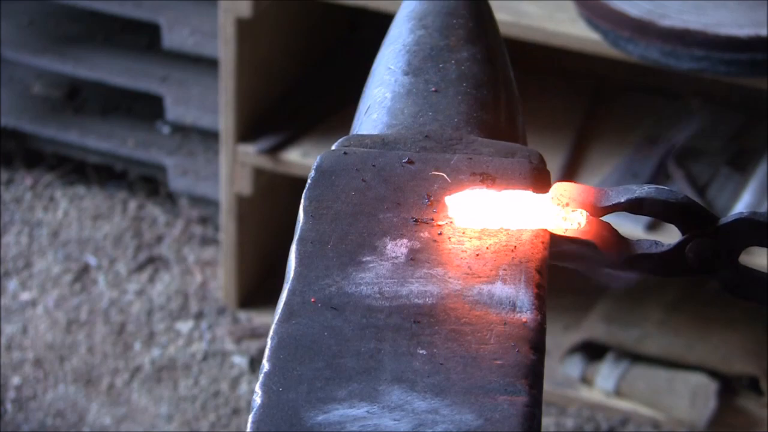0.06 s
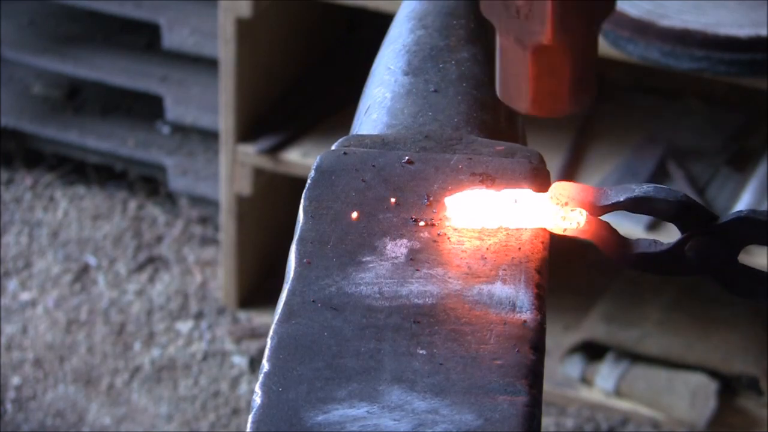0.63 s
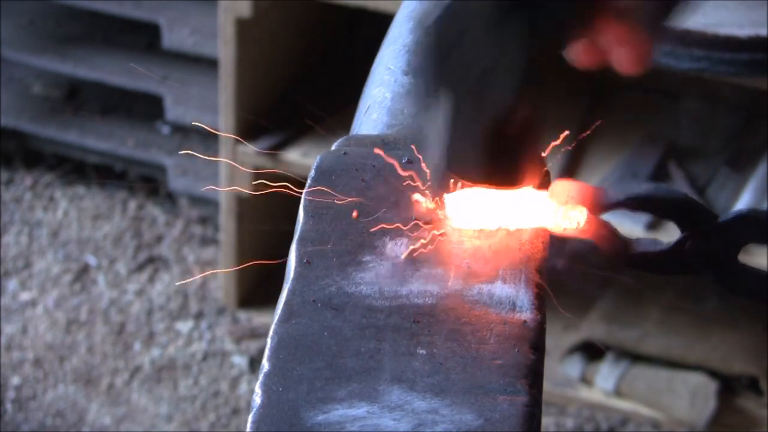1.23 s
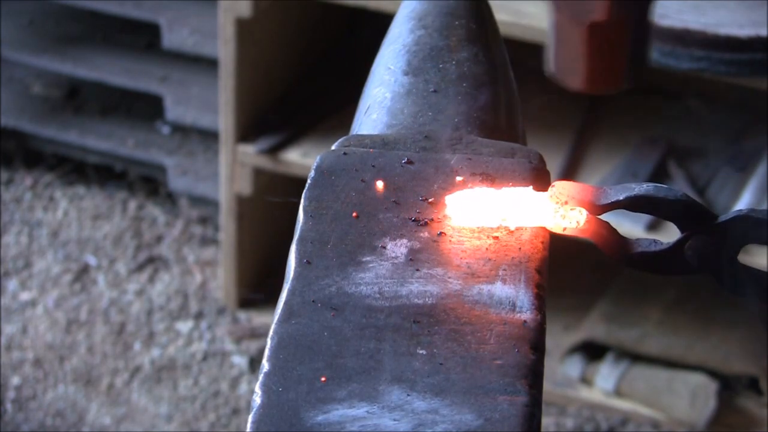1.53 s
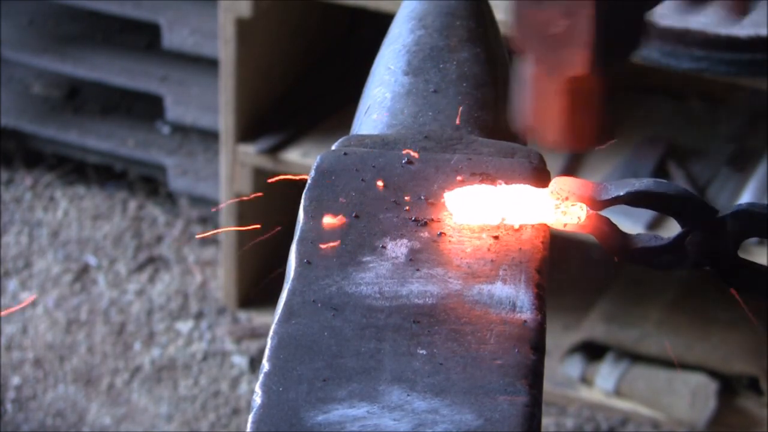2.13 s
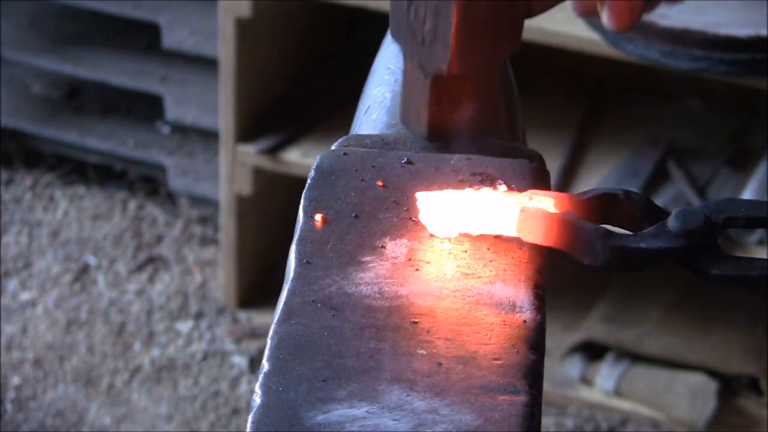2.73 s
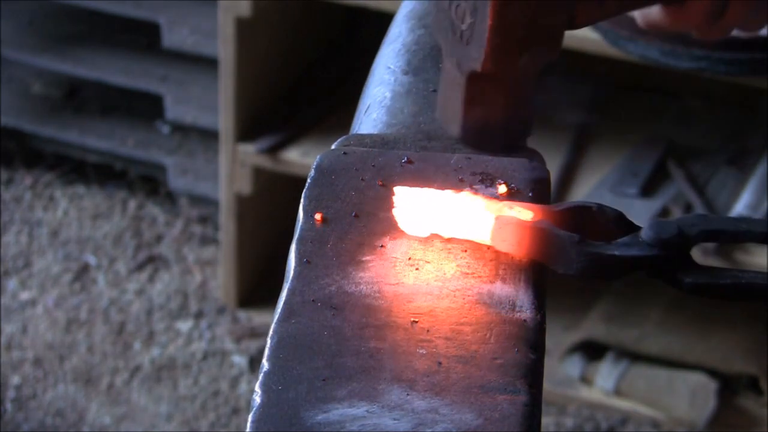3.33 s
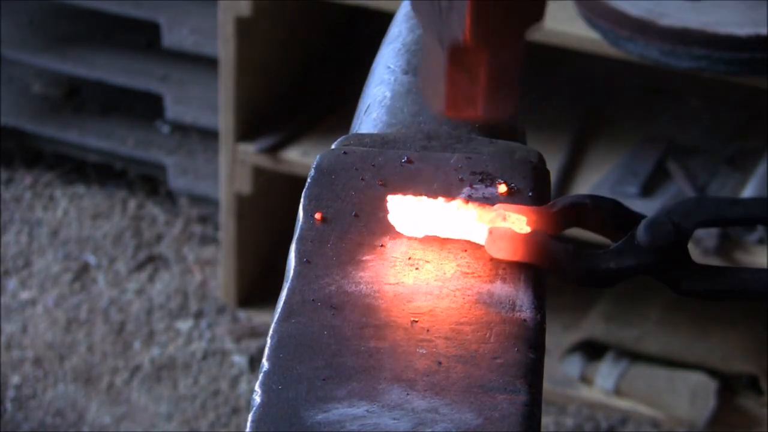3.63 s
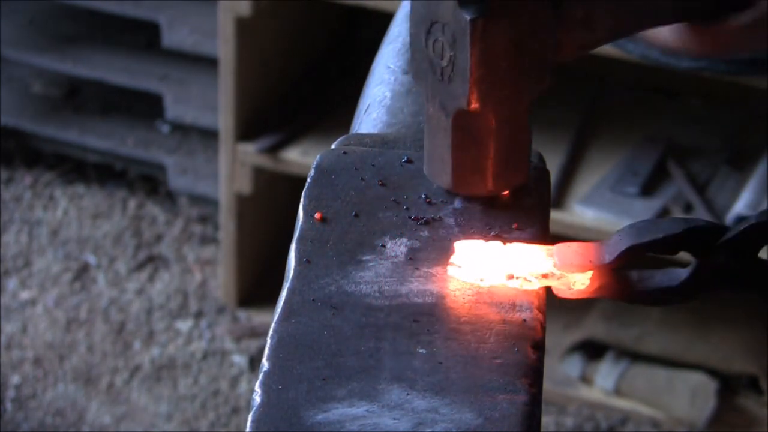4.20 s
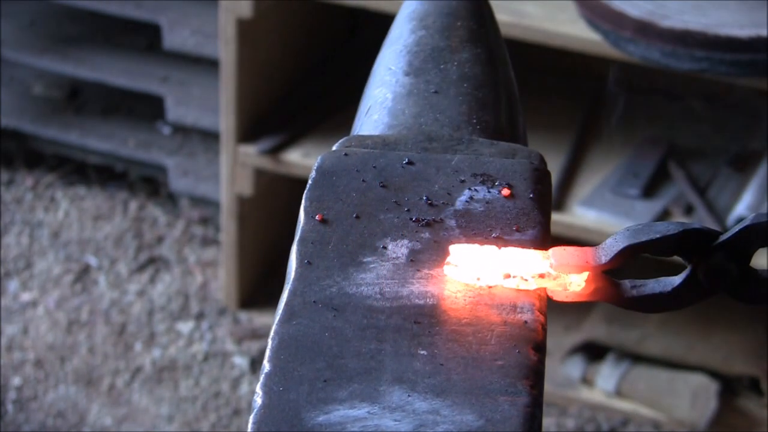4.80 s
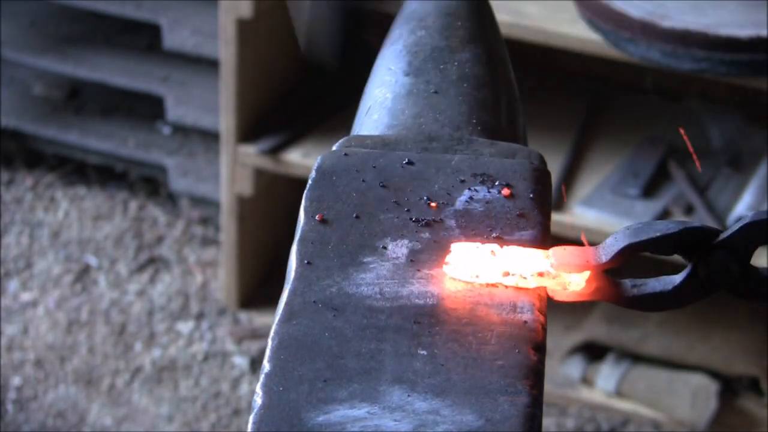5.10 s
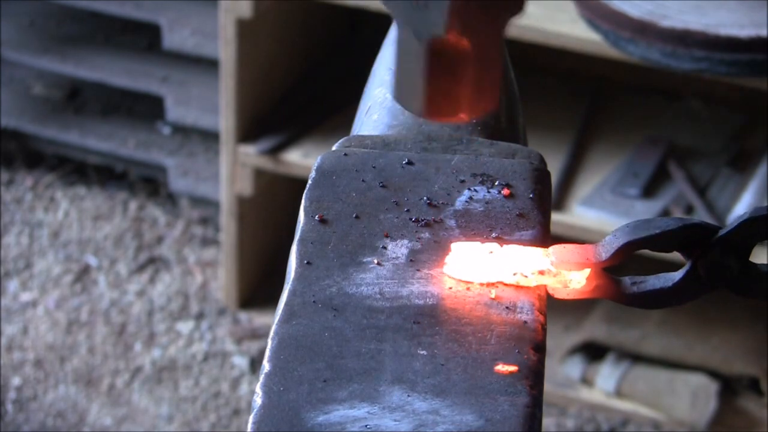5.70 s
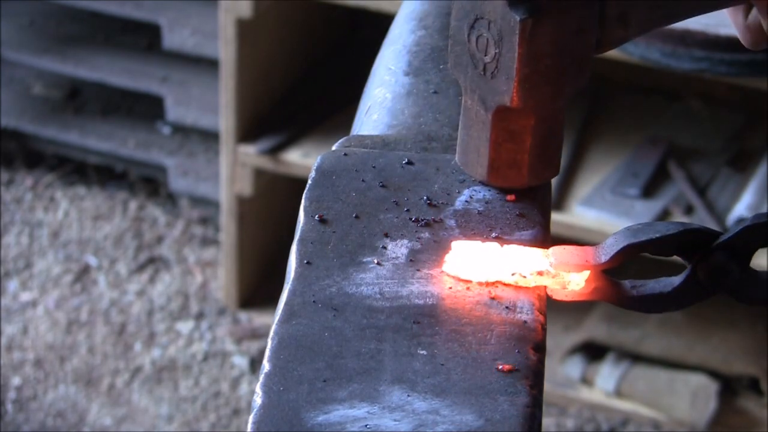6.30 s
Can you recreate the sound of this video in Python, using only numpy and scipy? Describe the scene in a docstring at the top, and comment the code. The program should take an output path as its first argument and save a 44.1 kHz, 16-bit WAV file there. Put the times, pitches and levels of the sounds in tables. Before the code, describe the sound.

A hand hammer strikes hot iron on a steel anvil three times, each blow a sharp crack with a short, bright ring, the first two followed by a light tap. The hammer then drops on the bare anvil and bounces. In a pause, tongs faintly scrape and clink. Two duller blows and a soft, thudding tap follow. The sound is close, in a small workshop with a faint hiss.

```python
"""Ringing hammer blows on a steel anvil: a smith forges hot iron in a small workshop.
Each blow knocks, cracks the scale, thumps the stand and rings anvil, hammer and tongs.
The loosely held hammer also taps the bare anvil and may bounce. Between blows the tongs turn
the iron and scale ticks off over a faint hiss. A limiter ducks the blows; the ring swells back."""
import sys
import numpy as np
from scipy import signal
from scipy.fft import rfft, irfft
from scipy.io import wavfile
from scipy.ndimage import uniform_filter1d

SR = 44100
rng = np.random.default_rng(int(sys.argv[2]) if len(sys.argv) > 2 else 0)


def unload_audio(sound):
    """Save the sound as a 16-bit wav file, at the path given as the first command line argument."""
    columns = np.transpose(np.atleast_2d(sound))
    # keep every value between -1 and 1, then stretch to whole-number steps
    steps = np.round(np.clip(columns, -1, 1) * 32767)
    wavfile.write(sys.argv[1], SR, steps.astype(np.int16))


N = 280035
TIME_S = np.arange(N) / SR
STRIKE_SAMPLES = 40000

# hammer head and tong modes, damped by the grip: pitch_hz, level_db, t60_s
TOOL_MODES = [(1282, -19.5, 0.065), (1436, -21, 0.18), (1505, -23.5, 0.05), (2732, -19.5, 0.069),
              (2826, -19.5, 0.028), (3090, -21, 0.015), (3300, -22, 0.031), (3497, -24, .05),
              (3680, -30.5, 0.052), (4080, -31.5, 0.071), (4200, -33.5, 0.04), (5500, -44, 0.047),
              (9657, -23.5, 0.076)]


def from_db(db):
    """Decibels to gain."""
    return 10 ** (np.asarray(db) / 20)


def rms_one(x):
    """Scale to rms 1."""
    return x / np.sqrt(np.mean(x ** 2) + 1e-20)


def at_hz(rows, hz, column=1):
    """Read a table column on a log-frequency axis."""
    rows = np.array(rows)
    return np.interp(np.log(np.maximum(hz, 1)), np.log(rows[:, 0]), rows[:, column])


def swell(rise_s, size):
    """Smooth rise from 0 to 1."""
    return 1 - np.exp(-TIME_S[:size] / rise_s)


def fade(t60_s, size):
    """Exponential decay, 60 dB in t60_s."""
    return np.exp(-np.log(1000) * TIME_S[:size] / t60_s)


def add(track, start_s, sound):
    """Mix a sound in along the last axis."""
    start = round(start_s * SR)
    track[..., start:start + sound.shape[-1]] += sound[..., :N - start]


def butter(x, hz, kind, order=2):
    """Causal Butterworth filter."""
    sos = signal.butter(order, np.clip(hz, 10, .48 * SR), kind, fs=SR, output="sos")
    return signal.sosfilt(sos, x)


def dying_noise(rows, size):
    """Third-octave noise bands, each with its own level and decay."""
    edges_hz = 40 * 2 ** (np.arange(28) / 3)
    white = rfft(rng.standard_normal(size))
    hz = np.fft.rfftfreq(size, 1 / SR)
    out = np.zeros(size)
    for low_hz, high_hz in zip(edges_hz, edges_hz[1:]):
        centre_hz = np.sqrt(low_hz * high_hz)
        band = irfft(white * ((hz >= low_hz) & (hz < high_hz)), size)
        band *= fade(at_hz(rows, centre_hz, column=2), size)
        energy_share = 2 * (high_hz - low_hz) / SR
        out += rms_one(band) * from_db(at_hz(rows, centre_hz)) * np.sqrt(energy_share / size)
    return out


def ring(modes, size, scatter_db, favoured_hz=1000, lift_db=0, width_oct=1):
    """Struck modes, randomly varied; the spot hit favours those near one pitch."""
    out = np.zeros(size)
    for hz, level_db, t60_s in modes:
        level_db += lift_db * np.exp(-(np.log2(hz / favoured_hz) / width_oct) ** 2)
        level_db += scatter_db * rng.standard_normal()
        life = min(size, int(2 * t60_s * SR))
        tone = np.sin(2 * np.pi * hz * TIME_S[:life]) * fade(t60_s, life)
        out[:life] += rng.choice([-1, 1]) * from_db(level_db) * tone
    return out


def background(hiss_db, drone_hz, drone_db):
    """Even hiss and rumble with an unsteady low drone."""
    # noise spectrum: frequency_hz, density_db
    spectrum = [(25, -32), (48, -11), (70, -4), (100, -16), (135, -5.5), (270, -10.5), (420, -14.5),
                (1000, -14.5), (1500, -19.5), (2200, -27.5), (3400, -32.5), (6000, -37), (12000, -42),
                (16000, -61.5)]
    colour = from_db(at_hz(spectrum, np.fft.rfftfreq(N, 1 / SR)))
    hiss = rms_one(irfft(rfft(rng.standard_normal(N)) * colour, N))
    drone = rms_one(butter(rng.standard_normal(N), [drone_hz - 3, drone_hz + 3], "band"))
    return from_db(hiss_db) * hiss + from_db(drone_db) * drone


def light_touch(rise_s, t60_s, centre_hz, clink_db, bump_db=-14.5, bump_hz=184, size=16384):
    """Gritty scrape, soft bump of iron on the anvil and a high clink of the tongs."""
    grit = rng.standard_normal(size) * from_db(2.5 * rng.standard_normal(size))
    scrape = rms_one(butter(grit, [centre_hz / 2, centre_hz * 2], "band"))
    bump_band_hz = [bump_hz / np.sqrt(2), bump_hz * np.sqrt(2)]
    bump = rms_one(butter(rng.standard_normal(size), bump_band_hz, "band"))
    clink = ring(TOOL_MODES, size, scatter_db=2, favoured_hz=10000, lift_db=13, width_oct=1.1)
    rub = (scrape + from_db(bump_db) * bump) * fade(t60_s, size)
    return (rub + from_db(clink_db) * clink) * swell(rise_s, size)


def scale_ticks():
    """Flakes of scale tick off the hot iron."""
    # flakes: start_s, level_db, centre_hz
    flakes = [(0.198, -57, 2060), (4.082, -61.5, 3430), (5.811, -54, 11900), (6.015, -52, 12160),
              (6.14, -55.5, 5150)]
    out = np.zeros(N)
    for start_s, level_db, centre_hz in flakes:
        tick = light_touch(rise_s=0.0019, t60_s=0.071, centre_hz=centre_hz, clink_db=-14)
        add(out, start_s, from_db(level_db) * tick)
    return out


def impact(thud_db, clank_db, clank_hz, lift_db):
    """Steel knocks on iron, the tools clank and the heavy stand answers late."""
    # anvil rocking on its stand: pitch_hz, level_db, t60_s
    stand_modes = [(145.1, -34.5, 0.28), (201, -26, 0.061), (257, -23.5, 0.042), (274, -18, 0.04),
                   (358.4, -27.5, .06), (534, -23.5, 0.055), (741.6, -19.5, 0.046), (812, -19, 0.031)]
    # steel on iron and crushed scale: centre_hz, density_db, t60_s
    knock_bands = [(50, -36, 0.037), (154, -12.5, 0.035), (364, -4, 0.025), (555, -14, 0.1),
                   (846, -3, 0.019), (1053, -4.5, 0.0068), (1260, 7.5, 0.021), (1660, -2.5, 0.021),
                   (2000, -0.5, 0.014), (3330, -12.5, 0.017), (4600, -18.5, 0.036), (8600, -24.5, 0.033),
                   (12900, -28, 0.0076), (15850, -25, .014)]
    thud = ring(stand_modes, STRIKE_SAMPLES, scatter_db=3.5) * swell(0.001, STRIKE_SAMPLES)
    clank = ring(TOOL_MODES, STRIKE_SAMPLES, scatter_db=1.27,
                 favoured_hz=clank_hz, lift_db=lift_db, width_oct=.4)
    body = from_db(thud_db) * thud + from_db(clank_db) * clank
    add(body, 0, from_db(24.5) * dying_noise(knock_bands, size=4096))
    return body


def anvil_ring(gain_db, treble_db):
    """The steel anvil rings on after the impact."""
    # anvil modes: pitch_hz, level_db, t60_s
    anvil_modes = [(1227, -11.8, .28), (1436, -19.5, .27), (2702, -34, .22), (2752, -44, .42),
                   (2767, -34, .24), (3294, -50, .5), (3304, -49, .55), (4083, -37, .18), (4925, -39, .25),
                   (4990, -28.5, .62), (5938, -42, .14), (6169, -38, .24), (6570, -35, .18),
                   (7671, -40, .19), (8033, -49, .16), (9313, -27, .28), (11240, -51, .14),
                   (13790, -53, .16), (14828, -47, .2)]
    return from_db(gain_db) * ring(anvil_modes, STRIKE_SAMPLES, scatter_db=1.24,
                                   favoured_hz=6600, lift_db=treble_db, width_oct=0.99)


def scale_crack(bright_hz, low_hz=1600, top_hz=11000):
    """Brittle scale bursts: a noise snap of unit energy."""
    burst = rng.standard_normal(256) * fade(t60_s=.003, size=256)
    burst = butter(burst, [low_hz, bright_hz], "band")
    burst = butter(burst, top_hz, "low")
    return burst / np.linalg.norm(burst)


def strike(body, tone, bright_hz, crack_db):
    """One contact as rows (impact, crack, ring); a longer, softer contact loses treble."""
    contact = swell(0.00044, STRIKE_SAMPLES)  # force builds as the metal yields
    body = butter(body * contact + 1e-18, bright_hz, "low")
    tone = butter(tone * contact + 1e-18, bright_hz, "low", order=1)
    crack = np.zeros(STRIKE_SAMPLES)
    add(crack, start_s=.0005, sound=from_db(crack_db) * scale_crack(bright_hz))
    return np.array([body, crack, tone])


def forging_blows():
    """Full blows on hot iron: cracking and bright mid-face, duller at the anvil's edge."""
    # blows: start_s, force_db, spot (0 = middle, 1 = edge)
    blows = [(0.4113, 6.5, 0.23), (1.244, 6, 0.061), (2.0577, 5.5, 0.02), (4.9204, 0, 0.93),
             (5.4502, 1.5, 0.93)]
    out = np.zeros((3, N))
    for start_s, force_db, spot in blows:
        body = impact(thud_db=-0.5, clank_db=2 - 15.5 * spot,
                      clank_hz=2770 + 1380 * spot, lift_db=6.5 + 11 * spot)
        tone = anvil_ring(gain_db=-4.5, treble_db=5 - 8 * spot)
        blow = strike(body, tone, bright_hz=11000, crack_db=-6 + 11.5 - 10.5 * spot)
        add(out, start_s, from_db(force_db) * blow)
    return out


def hammer_taps(restitution=0.485, rebound_loss_db=5, shortest_flight_s=0.012):
    """The hammer drops on the bare anvil; unless caught it bounces, each time sooner and weaker."""
    # drops: start_s, force_db, thud_db, clank_hz, flight_s (0 = caught)
    drops = [(0.517, -20, -10, 3050, 0), (1.3495, -11.5, -11.5, 3100, 0.0028),
             (2.7504, -7, -9, 3950, 0.085), (5.8349, -18, 8, 3010, 0)]
    out = np.zeros((3, N))
    for start_s, force_db, thud_db, clank_hz, flight_s in drops:
        while True:
            body = impact(thud_db, clank_db=5, clank_hz=clank_hz, lift_db=24 + force_db)
            tone = anvil_ring(gain_db=-12, treble_db=9)
            bright_hz = 5000 * 2 ** (force_db / 34.5)  # lighter is duller
            add(out, start_s, from_db(force_db) * strike(body, tone, bright_hz, crack_db=2))
            if flight_s < shortest_flight_s:
                break
            start_s += flight_s
            force_db -= rebound_loss_db
            flight_s *= restitution
    return out


def tong_turns(centre_hz=4600, grip_after_s=0.11, grip_db=-68.5):
    """Tongs turn the iron on the anvil face: a scrape, then the jaws clink."""
    # turns: start_s, level_db, rise_s, bump_db
    turns = [(3.214, -62.5, 0.042, -20), (3.983, -67, 0.006, 10.5), (4.228, -58.5, 0.026, -1)]
    out = np.zeros(N)
    for start_s, level_db, rise_s, bump_db in turns:
        scrape = light_touch(rise_s, t60_s=0.26, centre_hz=centre_hz, clink_db=7, bump_db=bump_db)
        add(out, start_s, from_db(level_db) * scrape)
    for start_s, *_ in turns:
        grip = light_touch(rise_s=0.01, t60_s=0.15, centre_hz=centre_hz, clink_db=17)
        add(out, start_s + grip_after_s, from_db(grip_db) * grip)
    return out


def workshop(x, delay_s, build_s, size=36000):
    """Reflections start at the nearest surfaces, thicken and die away."""
    # reverberation: centre_hz, level_db, t60_s
    room_bands = [(59.75, 0.5, 0.63), (146, -5, 0.34), (296, 1, 0.26), (725, -5, 0.25), (1340, -4.5, 0.24),
                  (2920, -6, 0.19), (6250, -1, 0.17), (10500, -1, 0.17), (15000, 0.5, 0.12)]
    build = 1 - np.exp(-np.maximum(TIME_S[:size] - delay_s, 0) / build_s)
    return signal.fftconvolve(x, dying_noise(room_bands, size) * build)[:N]


def scene():
    """Anvil close by, the room behind it."""
    impacts, cracks, anvil = forging_blows() + hammer_taps()
    contacts = impacts + tong_turns() + scale_ticks()
    room_send = contacts + from_db(-7.5) * cracks + from_db(-17) * anvil
    room = from_db(0.5) * workshop(room_send, delay_s=0.004, build_s=0.0034)
    ambience = background(hiss_db=-63.5, drone_hz=99.0, drone_db=-67.5)
    return (contacts + cracks + anvil + room + ambience)[None]


def limiter(x, threshold_db, release_db_per_s):
    """Gain drops at once on a loud blow and recovers steadily."""
    power = np.maximum(uniform_filter1d(x ** 2, size=88), 1e-12)
    over_db = np.maximum(10 * np.log10(power) - threshold_db, 0)
    recovery_db = release_db_per_s * TIME_S
    return x * from_db(recovery_db - np.maximum.accumulate(over_db + recovery_db, axis=-1))


def record(dry):
    """Limiter, rounded peaks and a steep top cut."""
    ceiling, cutoff_hz = from_db(-4.5), 16300
    limited = limiter(dry, threshold_db=-14, release_db_per_s=89)
    rounded = ceiling * np.tanh(limited / ceiling)
    return signal.sosfilt(signal.ellip(10, .2, 80, cutoff_hz, fs=SR, output="sos"), rounded)


dry = scene()
out = record(dry)
unload_audio(out)
```